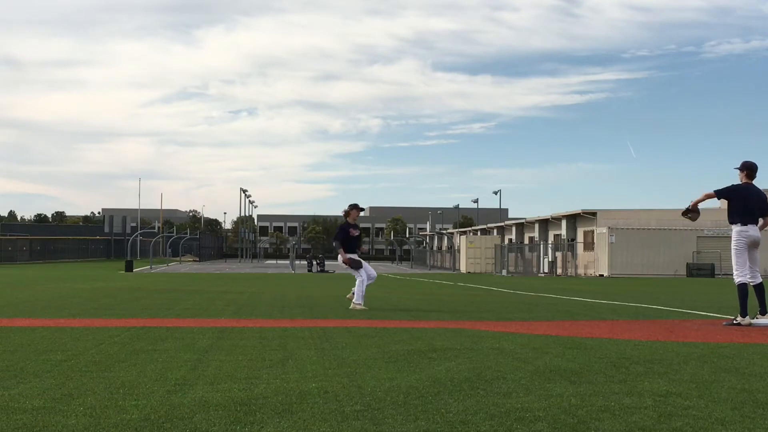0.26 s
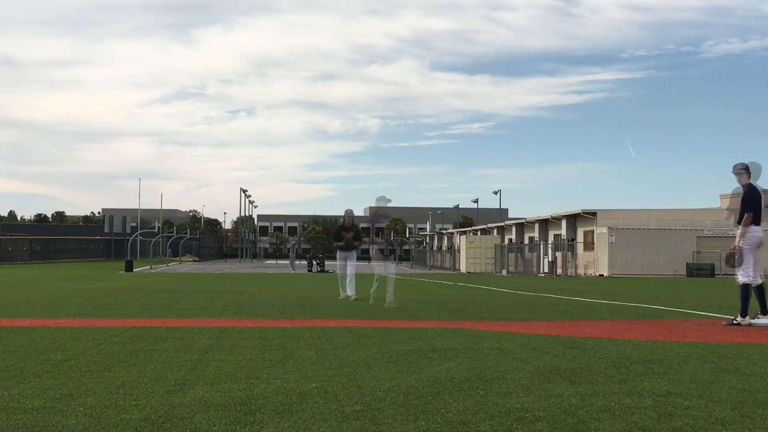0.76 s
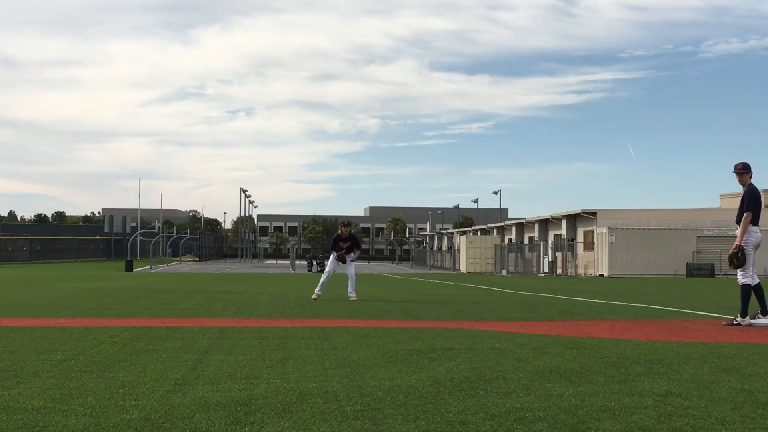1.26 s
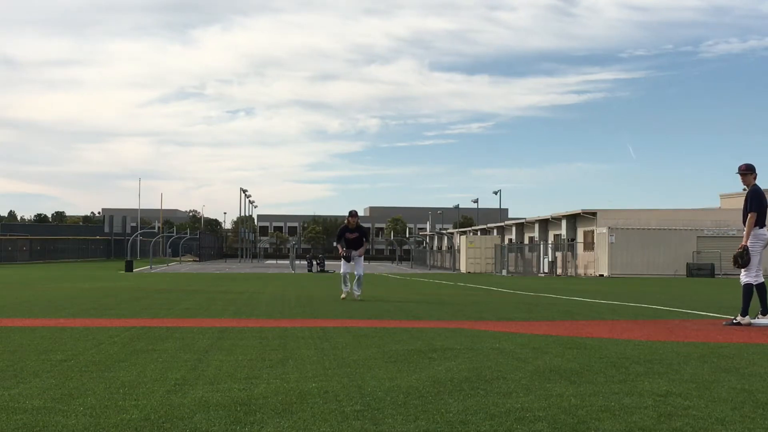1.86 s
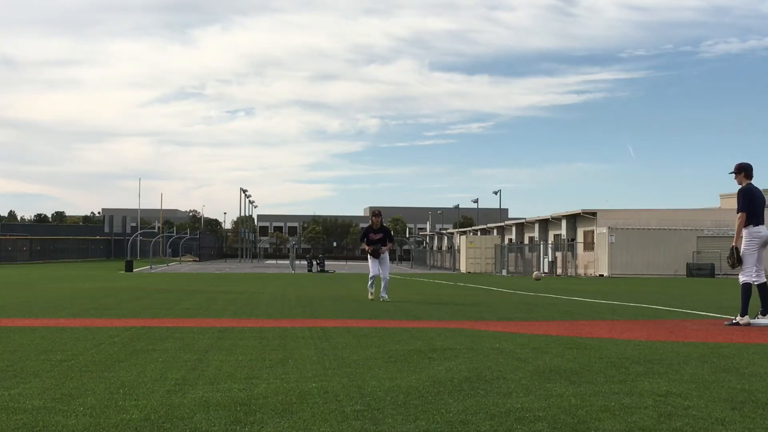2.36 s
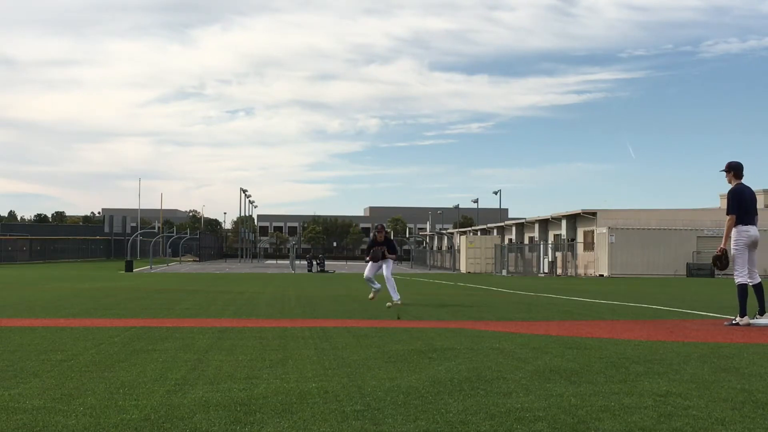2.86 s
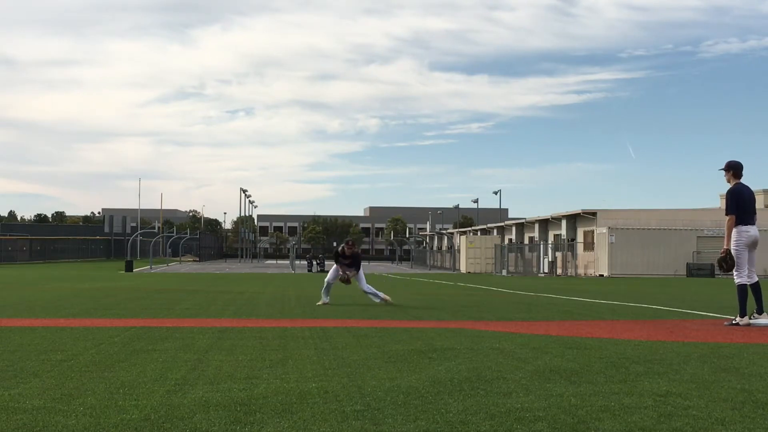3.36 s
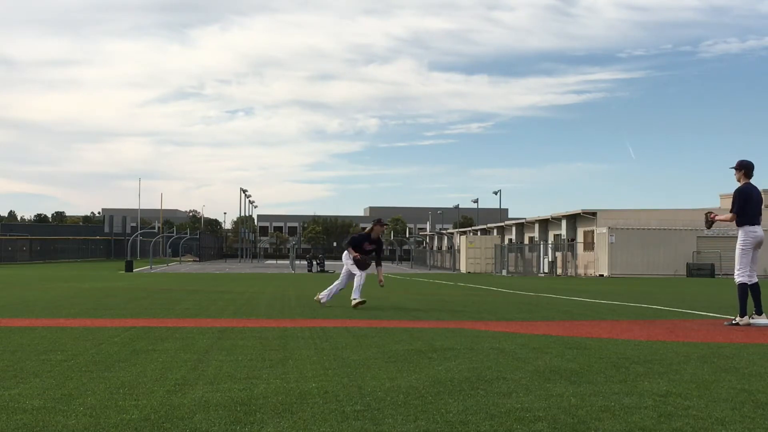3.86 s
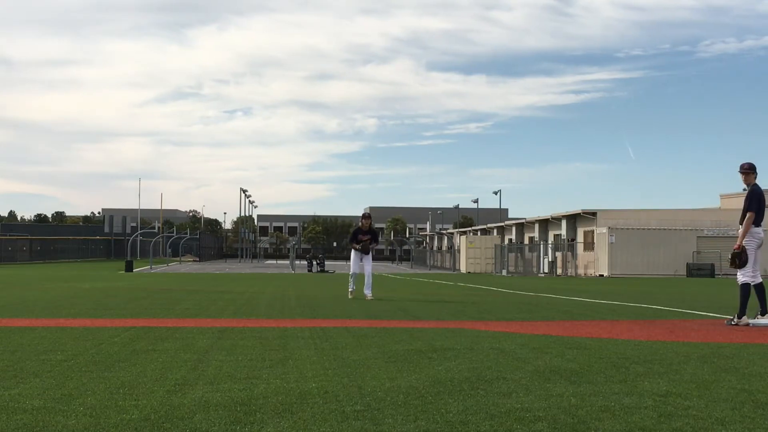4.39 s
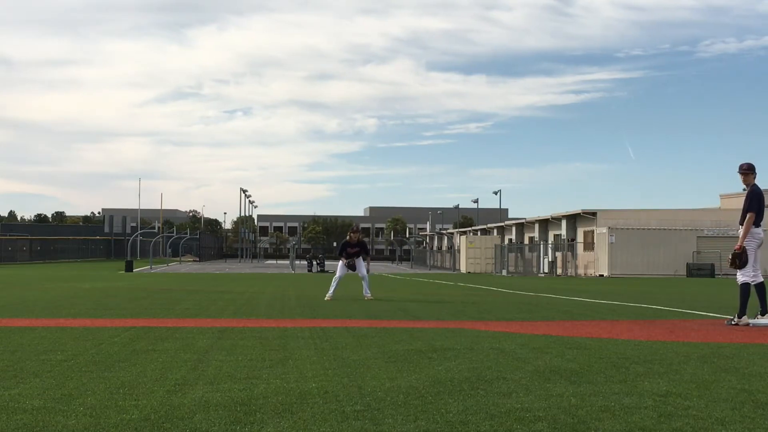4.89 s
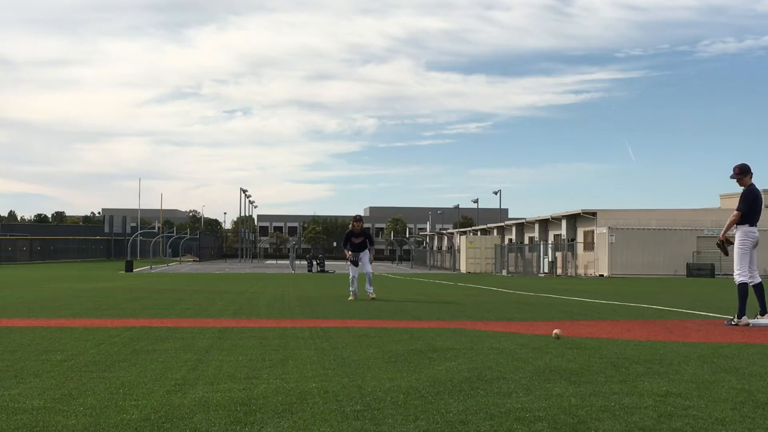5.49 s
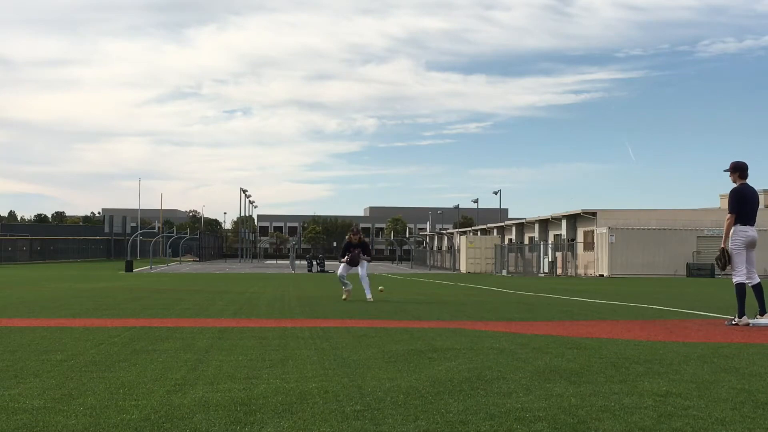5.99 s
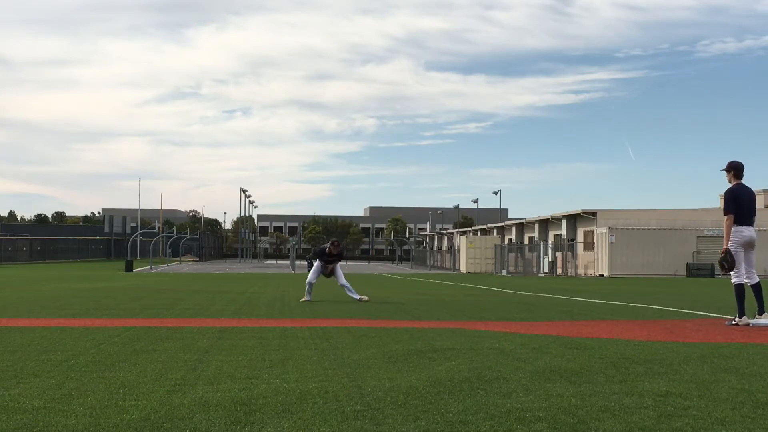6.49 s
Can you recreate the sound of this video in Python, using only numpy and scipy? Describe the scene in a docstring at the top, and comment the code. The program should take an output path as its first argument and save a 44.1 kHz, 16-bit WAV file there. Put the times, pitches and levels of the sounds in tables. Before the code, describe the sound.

Baseball practice outdoors: a ball smacks a mitt, then two sharp wooden bat cracks with slapping echoes, turf thumps and glove catches over wind rumble.

```python
"""Infield practice on artificial turf, over wind rumble, far traffic and a faint hiss (all shaped noise).
First a thrown ball slaps into a stiff mitt: a click with a crackle, a soft thump and creaking leather.
Then a nearby wooden bat hits a ground ball: a tick, a short knock and ringing wood, echoed by fence and walls.
The ball swishes (noise) and thumps (a sliding tone) on the turf, crumbs patter back, and a glove catches it.
A bird chips after each hit, a far engine hums around the second catch; a second hit ends in a deep catch."""
import sys
import numpy as np
from scipy import signal
from scipy.fft import rfft, irfft
from scipy.io import wavfile
from scipy.ndimage import uniform_filter1d

SR = 44100
rng = np.random.default_rng(int(sys.argv[2]) if len(sys.argv) > 2 else 0)


def materialize(psi):
    """Save the field psi as 16-bit PCM at rate SR to the path in sys.argv[1].

    A 1-D psi becomes a single channel; in a 2-D psi each row is a channel.
    """
    bounded = np.clip(np.atleast_2d(psi).T, -1, 1)
    quanta = np.round(bounded * 32767).astype(np.int16)
    wavfile.write(sys.argv[1], SR, quanta)


N = 297234
T = np.arange(SR // 4) / SR  # time inside one event (s)
TIME = np.arange(N) / SR  # time in the whole scene (s)

# bat hits: start_s, level_db, knock_hz, knock_rise_s, sweet (nearness to the sweet spot, 0-1); then, relative
# to the hit's level, tick_db, push_db, ground_delay_s, scatter_db, scatter_tilt_db_per_octave,
# scatter_peak_s, wall_echo_db, wall_brightness_ratio
BAT_HITS = [(1.1034, -10, 1560, 0.00095, 0.2, -12.5, -19.5, .0045, -5.5, 0.5, 0.066, -5.5, 1.12),
            (4.6547, -13.5, 1400, 0.0007, 0.95, -5.5, -14, .0035, -4.5, 3.5, 0.073, -6, 1.34)]
# colour of the bat's tick: pitch_hz, level_db
TICK_COLOUR = [(1500, 6), (2600, 5.5), (4000, 6), (5200, -20), (7300, 1.5), (8800, 11.5), (11000, 4.5),
               (13000, -3), (16000, -22)]
# colour of the swish on the turf and of the faint noise ahead of a catch: pitch_hz, level_db
SWISH_COLOUR = [(800, 12), (2400, -4.5), (4300, 2), (7000, -8.5), (9500, -10), (12500, -11.5), (16000, -22)]


def undb(db):
    """Turn decibels into a plain multiplier."""
    return 10 ** (np.asarray(db) / 20)


def unit(x):
    """Scale to an average (RMS) level of 1."""
    return x / np.sqrt(np.mean(x ** 2))


def sized(x):
    """Scale to a total energy of 1."""
    return x / np.linalg.norm(x)


def add(out, s, x):
    """Mix x in from time s."""
    i = int(round(s * SR))
    out[i:i + len(x)] += x[:max(len(out) - i, 0)]


def colour(x, points):
    """Filter x to the given (Hz, dB) shape without smearing it backwards; white noise keeps its power."""
    size = 8192
    hz, db = np.transpose(points)
    f = np.maximum(np.arange(size // 2 + 1), .5) * SR / size
    inside = np.interp(np.log(f), np.log(hz), db)
    # beyond the first and last points the level falls 12 dB per octave
    edges = 40 * np.log10(np.minimum(f / hz[0], 1) * np.minimum(hz[-1] / f, 1))
    # folding the cepstrum gives a response that starts at once (minimum phase)
    cepstrum = irfft(np.log(undb(inside + edges)))
    cepstrum[1:size // 2] *= 2
    cepstrum[size // 2 + 1:] = 0
    response = irfft(np.exp(rfft(cepstrum)))
    return signal.fftconvolve(x, sized(response))[:len(x)]


def tilted(points, tilt_db):
    """Make a colour brighter or duller by so many dB per octave."""
    return [(hz, db + tilt_db * np.log2(hz)) for hz, db in points]


def grains(envelope, spread_db):
    """Dense tiny clicks of uneven size, with the energy of the envelope."""
    sizes = undb(spread_db * rng.standard_normal(len(envelope)))
    x = rng.standard_normal(len(envelope)) * sizes * envelope
    return x * np.linalg.norm(envelope) / np.linalg.norm(x)


def walk(rate):
    """Wandering random values: each is held 1 / rate s, then smoothed twice; spread near 1."""
    hold = int(SR / rate)
    steps = np.repeat(rng.standard_normal(N // hold + 1), hold)
    smooth = uniform_filter1d(uniform_filter1d(steps, hold), hold)
    return 1.6 * smooth[:N]


def bump(t, s, spread_s):
    """A smooth bell-shaped swell around time s."""
    return np.exp(-.5 * ((t - s) / spread_s) ** 2)


def swells(events):
    """Add up the bell-shaped swells of (time s, level dB, spread s) over the whole scene."""
    return sum(undb(db) * bump(TIME, s, spread_s) for s, db, spread_s in events)


def snap(decay_s, crackle):
    """A hard contact: a clean click followed by a brief crackle."""
    tail = grains(np.exp(-T / decay_s) * (1 - np.exp(-2 * T / decay_s)), 2.3)
    return (T == 0) + crackle * sized(tail)


def knock(hz, rise_s):
    """A few cycles that swell and die as the ball squashes and springs back."""
    swell = (T / rise_s) ** 2 * np.exp(2 - 2 * T / rise_s)
    return swell * -np.sin(2 * np.pi * hz * T)


def thump(hz, low_hz, decay_s):
    """A soft contact: a few cycles that slide down in pitch as they die away."""
    rise_s, glide_s = 0.00059, 0.0039
    pitch = low_hz + (hz - low_hz) * np.exp(-T / glide_s)
    swell = (1 - np.exp(-T / rise_s)) * np.exp(-T / decay_s)
    push = -np.sin(2 * np.pi * np.cumsum(pitch) / SR) * swell
    # the padding absorbs what lies well above the starting pitch
    return signal.sosfilt(signal.butter(6, 1.32 * hz, fs=SR, output="sos"), push)


def ring(modes):
    """Struck modes of (Hz, dB, s to fall by 60 dB) die away, each at its own rate."""
    tones = sum(undb(db - 60 * T / t60) * -np.sin(2 * np.pi * hz * T) for hz, db, t60 in modes)
    return tones * (1 - np.exp(-T / .0005))


def scatter(points, peak_s, swell_s, fade_s):
    """A wash of countless small reflections, of energy 1: it swells, peaks and dulls as it fades."""
    split_hz, treble_fade = 3500, 0.67  # the treble's fade time is this fraction of the body's

    def wash(fade):
        return grains(np.exp(np.minimum((T - peak_s) / swell_s, (peak_s - T) / fade)), 5.5)

    body = colour(wash(fade_s), points)
    treble = colour(wash(fade_s * treble_fade), points)
    low = signal.sosfilt(signal.butter(2, split_hz, fs=SR, output="sos"), body)
    high = signal.sosfilt(signal.butter(2, split_hz, "high", fs=SR, output="sos"), treble)
    return sized(low + high)


def slap_back(db, brightness):
    """One crisp, slightly smeared reflection off a flat wall; brightness shifts its colour up or down."""
    # colour of a wall echo: pitch_hz, level_db
    wall_colour = [(500, 2), (1000, 12.5), (1700, 11), (3100, -4), (4300, -18), (5600, -24), (8500, -17),
                   (16000, -52)]
    smear = snap(0.0009, 0.9)
    return undb(db) * sized(colour(smear, [(hz * brightness, d) for hz, d in wall_colour]))


def hiss():
    """Faint steady hiss: shaped noise."""
    # colour of the hiss: pitch_hz, level_db
    hiss_colour = [(3000, 4), (7300, -6), (9300, -0.5), (15500, -9)]
    return unit(colour(rng.standard_normal(N), hiss_colour)) * undb(-83)


def far_traffic():
    """Distant traffic blurs into a smooth wash of noise that wavers in level."""
    # slow changes of the traffic, before its trim and waver: time_s, level_db
    traffic_levels = [(0.0, -56.5), (0.77, -60), (1.2, -55.5), (3.79, -57.5), (4.11, -59), (4.52, -56),
                      (6.51, -56.5), (6.74, -55)]
    # colour of the traffic: pitch_hz, level_db
    traffic_colour = [(260, -39), (450, -13), (562, -9), (614, -5), (745, -1.5), (972, 0.5), (1250, -1.5),
                      (2660, -27), (4530, -38), (7280, -40), (15500, -53.5)]
    trim_db, waver_db, wavers_per_s = 0.25, 1.55, 6.39
    level_db = np.interp(TIME, *np.transpose(traffic_levels)) + trim_db + waver_db * walk(wavers_per_s)
    return unit(colour(rng.standard_normal(N), traffic_colour)) * undb(level_db)


def wind_rumble():
    """Low noise swells and slackens with the wind, with quick gusts riding on it."""
    # slow changes of the wind, before its trim and gusts: time_s, level_db
    wind_levels = [(0.0, -50.5), (0.39, -52.5), (0.71, -52.5), (1.18, -49), (2.21, -52), (2.59, -51),
                   (2.98, -52.5), (3.4, -50), (4.13, -53.5), (4.71, -48), (5.78, -51), (6.74, -50.5)]
    # colour of the rumble: pitch_hz, level_db
    rumble_colour = [(13, -74), (22, -30), (27, -46), (35, -20), (46, -7.5), (75, 1), (152, -4), (217, -10),
                     (238, -12), (290, -15.5), (389, -24), (520, -36), (680, -60.5), (1140, -120)]
    trim_db, gust_db, gusts_per_s = 2, 0.57, 12
    level_db = np.interp(TIME, *np.transpose(wind_levels)) + trim_db + gust_db * walk(gusts_per_s)
    return unit(colour(rng.standard_normal(N), rumble_colour)) * undb(level_db)


def wind_buffets():
    """Wind pushes on the microphone: short swells of very low noise."""
    # buffets: middle_s, level_db, spread_s
    pushes = [(.07, -44.5, 0.027), (.22, -41, 0.016), (2.72, -47, 0.016), (4.55, -46.5, 0.053),
              (4.68, -44, 0.024)]
    # colour of a buffet: pitch_hz, level_db
    buffet_colour = [(30, -49), (48, -12), (75, -2), (110, 2), (170, -22)]
    return unit(colour(rng.standard_normal(N), buffet_colour)) * swells(pushes)


def far_engine():
    """A far engine hums for a while: one tone of slightly wavering pitch."""
    # rise and fall of the hum: time_s, level_db
    hum_levels = [(2.1, -87), (2.4, -52), (2.9, -49.5), (3.45, -53), (3.7, -59), (3.9, -92)]
    pitch_hz = 144.5 * (1 + 0.0069 * walk(4.15))
    tone = np.sin(2 * np.pi * np.cumsum(pitch_hz) / SR)
    return tone * undb(np.interp(TIME, *np.transpose(hum_levels)))


def field():
    """The background: wind, far traffic, one far engine and hiss."""
    return wind_rumble() + wind_buffets() + far_traffic() + far_engine() + hiss()


def bird():
    """Tiny far chips, each a blend of a clear rising tone and a short dry rasp of noise."""
    # chips: middle_s, level_db, pitch_hz, half_width_s, rasp (0 clear - 1 raspy)
    chips = [(1.374, -68, 2900, .003, 0.9), (1.415, -63, 3150, .004, 0.4), (1.477, -60, 2400, .003, 0.6),
             (1.517, -55.5, 2450, 0.0011, .7), (1.542, -64, 2600, 0.0032, 0),
             (1.5625, -57.5, 2480, 0.0012, .7), (1.607, -62, 2400, .0016, .6),
             (5.027, -56, 2560, .003, 0.44), (5.092, -58, 2700, .003, 0.35)]
    # colour of the rasp: pitch_hz, level_db
    rasp_colour = [(1900, -18), (2450, 16), (3200, -5), (4100, -6), (5200, -30)]
    lead_s, rise_hz_per_s = .015, 15000
    out = np.zeros(N)
    u = T - lead_s  # time from the middle of the chip
    for s, db, hz, width_s, rasp in chips:
        swell = bump(u, 0, width_s)
        tone = swell * np.sin(2 * np.pi * (hz + .5 * rise_hz_per_s * u) * u)
        dry_rasp = colour(grains(swell, 2), rasp_colour)
        add(out, s - lead_s, undb(db) * ((1 - rasp) * tone + rasp * dry_rasp))
    return out


def infill_spray():
    """Rubber crumbs patter back and shoes scuff: swells of tiny clicks."""
    # sprays: middle_s, level_db, spread_s
    sprays = [(1.74, -76, 0.21), (2.62, -79, 0.093), (3.26, -84, 0.31), (5.09, -75, 0.076),
              (5.28, -80, 0.18), (6.48, -83, 0.057)]
    # colour of the spray: pitch_hz, level_db
    spray_colour = [(1500, 2), (3000, 11), (5500, 6), (8000, 1), (11500, 2), (15000, -11)]
    return colour(grains(swells(sprays), 4.1), spray_colour)


def turf():
    """The ball brushes the blades (noise), thumps the ground (a sliding tone) and knocks faintly itself."""
    # bounces: time_s (the thump begins 4 ms before), thump_db, start_hz, final_hz, thump_decay_s,
    # swish_db, swish_tilt_db_per_octave, swish_spread_s
    bounces = [(1.2053, -15, 340, 79.5, 0.0063, -67, 10, 0.0016),
               (1.266, -32.5, 346, 201, 0.0045, -86, -2, .003),
               (2.0748, -23, 360, 108, 0.005, -50, 4, 0.0053),
               (2.793, -35.5, 307, 131, 0.0082, -68, 1.5, 0.004),
               (4.8943, -19.5, 353, 73, 0.011, -51, 10, 0.0032),
               (5.53, -33, 288, 133, 0.0095, -59, -1, 0.0047)]
    lead_s = .02  # room for the swish to swell
    out = np.zeros(N)
    for s, db, hz, low_hz, decay_s, swish_db, tilt_db, swish_s in bounces:
        add(out, s - .004, undb(db) * thump(hz, low_hz, decay_s))
        tail = 0.074 * (T > lead_s) * np.exp(-T / 0.05)
        brush = grains(bump(T, lead_s, swish_s) + tail, 0.53)
        add(out, s - lead_s - .0034, undb(swish_db) * colour(brush, tilted(SWISH_COLOUR, tilt_db)))
        add(out, s - .0035, undb(db - 29) * knock(2130, rise_s=0.00079))
    return out


def catch_echoes():
    """Distinct reflections of the catches, each from its own spot."""
    # echoes: start_s, level_db, brightness_ratio
    echoes = [(.2305, -38, 2.6), (.2395, -41, 2.4), (.258, -42, 2.3), (.2615, -38, 1.5), (0.269, -36, 1.5),
              (.278, -32.5, 1.9), (3.19, -43, 4), (3.2, -48, 3.2), (3.219, -46, 3.2), (6.3655, -45, 3.3),
              (6.3735, -50, 4), (6.3835, -51, 5)]
    out = np.zeros(N)
    for s, db, brightness in echoes:
        add(out, s, slap_back(db, brightness))
    return out


def gloves():
    """The ball slaps the leather and thumps the pocket; the glove creaks, echoes answer faintly."""
    # catches: slap_s, slap_db, slap_decay_s, thump_db, thump_final_hz, creak_db, early_noise_db, scatter_db
    catches = [(0.2159, -10.5, 0.00096, -33, 287, -28, -67, -32.5),
               (3.1514, -15.5, 0.00087, -18.5, 179, -26.5, -46.5, -37.5),
               (6.3376, -17.5, 0.0005, -22, 125, -23, -62, -37)]
    # colour of the stiff mitt that takes the throw: pitch_hz, level_db
    mitt = [(500, -6), (1050, 11), (1550, 2), (2150, 8), (3000, -12), (3800, 2), (5400, -1), (6500, -10),
            (11000, -19), (16000, -42)]
    # colour of the softer glove that takes the first ground ball: pitch_hz, level_db
    soft_glove = [(500, 1), (1000, -20.5), (1500, -2), (2400, 2.5), (4000, -1), (7200, -2.5), (9000, -9),
                  (11500, -10), (16000, -38)]
    # rounder colour of the last ball, deep in the pocket: pitch_hz, level_db
    deep_pocket = [(600, -19), (1200, -2), (1750, 4), (2400, 10.5), (3600, -5), (5000, -4), (7000, -4),
                   (9500, -18), (12000, -11), (16000, -30)]
    # colour of the scattered echoes: pitch_hz, level_db
    echo_colour = [(700, -30), (2000, 16.5), (3800, 6), (6000, -2), (11000, -12), (16000, -32)]
    # a faint puff of noise starts lead_s before the slap and peaks after puff_s
    lead_s, puff_s, creak_s = .005, .002, .005
    out = np.zeros(N)
    for catch, leather in zip(catches, (mitt, soft_glove, deep_pocket)):
        s, db, slap_s, thump_db, low_hz, creak_db, early_noise_db, echo_db = catch
        early_noise = grains(T / puff_s * np.exp(1 - T / puff_s), 4.4)
        add(out, s - lead_s, undb(early_noise_db) * colour(early_noise, SWISH_COLOUR))
        slap = sized(colour(snap(slap_s, 1.5), leather))
        creak = sized(colour(snap(creak_s, 2.6), leather))
        add(out, s, undb(db) * slap + undb(creak_db) * creak)
        add(out, s + 0.00069, undb(thump_db) * thump(hz=343, low_hz=low_hz, decay_s=0.0029))
        add(out, s, undb(echo_db) * scatter(echo_colour, peak_s=0.045, swell_s=0.099, fade_s=0.087))
    return out


def bat_walls():
    """The batter stays put, so the same fence and walls throw every crack back after the same delays."""
    # fence and walls: delay_s, level_db (relative to the strongest), brightness_ratio
    surfaces = [(.021, -22, 1.7), (.0285, -20, 1.5), (.043, -11, 0.9), (0.0535, 0, 1.15), (.057, -8, 0.95),
                (.06, -9, 1.05), (0.0645, -5, 1), (.0795, -14, 1.1), (.085, -11, 1.05), (.099, -8, 1.05),
                (.111, -9, 0.8), (.121, -16, 1.1), (.145, -21, 1.2)]
    # strong flat walls also return the bright tick; weaker ones keep less of it
    wall_tick_db = -19
    bright_tick = [(hz, d) for hz, d in TICK_COLOUR if hz > 5000]
    out = np.zeros(N)
    for s, db, *_, echo_db, brightness in BAT_HITS:
        for delay_s, wall_db, wall_brightness in surfaces:
            tick = undb(wall_tick_db + wall_db) * sized(colour(snap(.0005, .5), bright_tick))
            echo = slap_back(0, brightness * wall_brightness) + tick
            add(out, s + delay_s, undb(db + echo_db + wall_db) * echo)
    return out


def bat():
    """Tick, knock and briefly ringing wood; the turf repeats the crack, the surroundings scatter it."""
    # ringing modes of the wood: pitch_hz, off_sweet_spot_db, on_sweet_spot_db, fall_by_60_db_s
    modes = [(790, -46, -24, 0.021), (1280, -9, -15.5, 0.031), (1475, -19, -13, 0.018),
             (1860, -8, -29, 0.031), (2140, -21, -21, 0.022), (2600, -9.5, -19, 0.012),
             (3130, -33, -24, 0.022), (3605, -34, -27, 0.012), (4260, -16, -21, 0.0077),
             (6300, -33, -16, 0.0052)]
    # colour of the scattered echoes, before the tilt of each hit: pitch_hz, level_db
    scatter_colour = [(500, -14), (1150, 16), (1700, 0.5), (3000, -3.5), (4300, -13), (6500, -24.5),
                      (11000, -28), (16000, -54)]
    knock_lag_s, ground_db = 0.00021, -16.5  # the wood answers just after first contact
    out = np.zeros(N)
    for s, db, hz, rise_s, sweet, tick_db, push_db, ground_s, scatter_db, tilt_db, peak_s, *_ in BAT_HITS:
        wood = ring([(f, off_db + sweet * (on_db - off_db), t60) for f, off_db, on_db, t60 in modes])
        tick = undb(tick_db) * colour(snap(0.00083, 0.46), TICK_COLOUR)
        crack = knock(hz, rise_s)
        add(out, s, undb(db) * tick)
        add(out, s + knock_lag_s, undb(db) * (crack + wood))
        # the turf's reflection is duller: it keeps only half of the tick
        add(out, s + ground_s, undb(db + ground_db) * (crack + 0.48 * tick))
        # the whole bat recoils
        add(out, s, undb(db + push_db) * thump(hz=340, low_hz=170, decay_s=0.0026))
        wash = scatter(tilted(scatter_colour, tilt_db), peak_s, swell_s=0.029, fade_s=0.056)
        add(out, s, undb(db + scatter_db) * wash)
    return out


def scene():
    """The field, the play on it and its echoes, heard by one microphone."""
    background = field() + bird()
    play = infill_spray() + turf() + gloves() + bat()
    echoes = catch_echoes() + bat_walls()
    return (background + play + echoes)[None]


def record(dry):
    """The recorder cuts the top: a steep low-pass filter at 15900 Hz."""
    return signal.sosfilt(signal.ellip(8, .2, 70, 15900, fs=SR, output="sos"), dry)


dry = scene()
out = record(dry)
materialize(out)
```